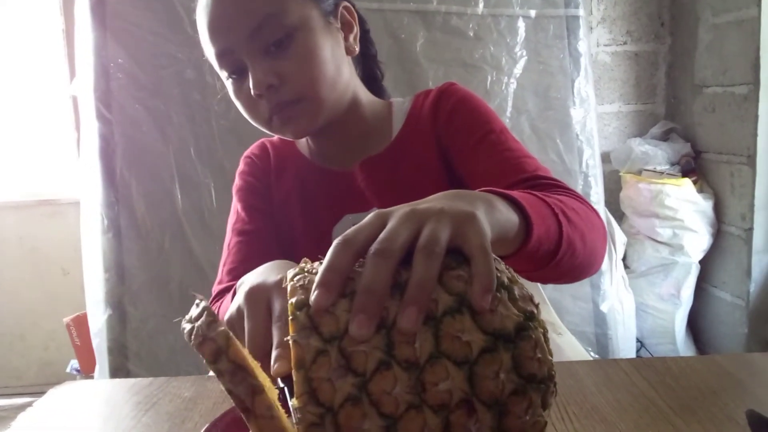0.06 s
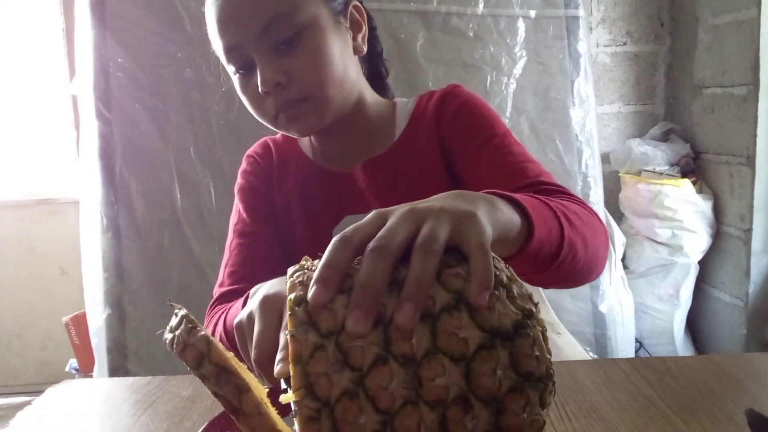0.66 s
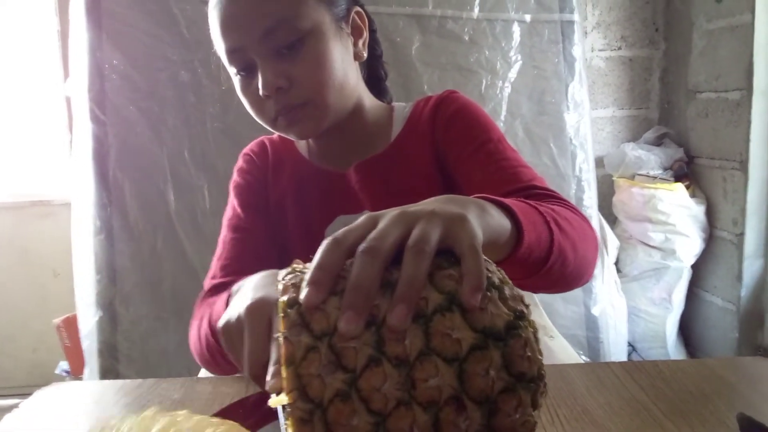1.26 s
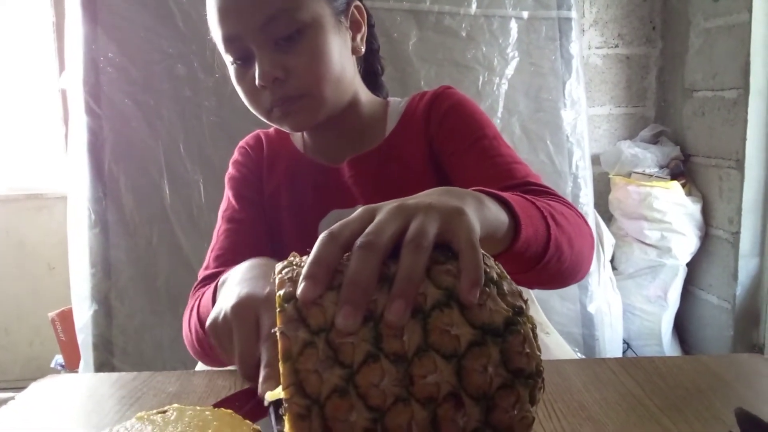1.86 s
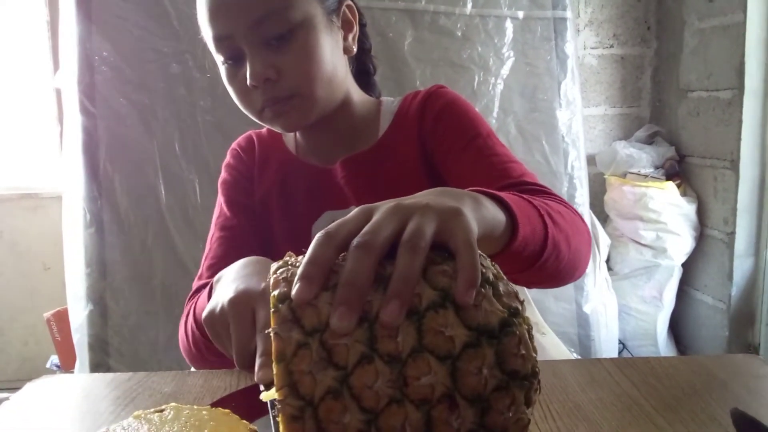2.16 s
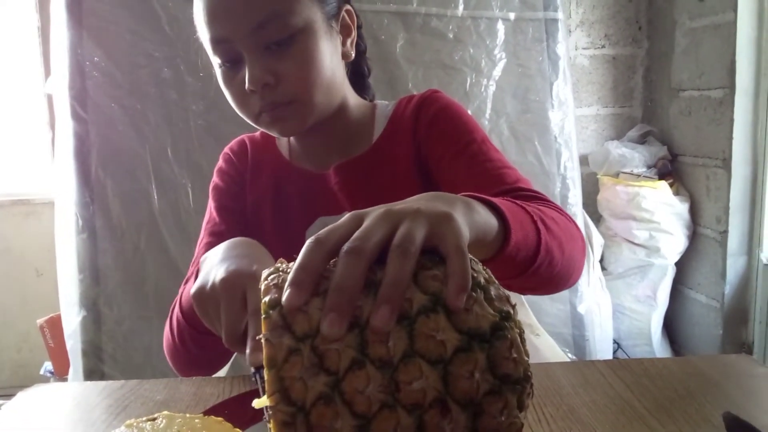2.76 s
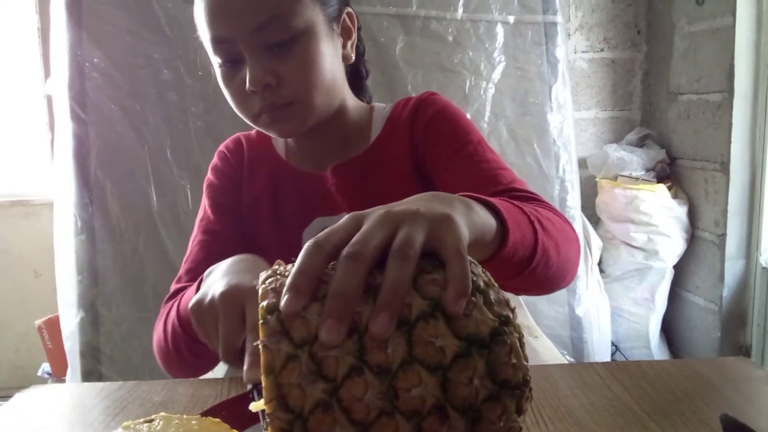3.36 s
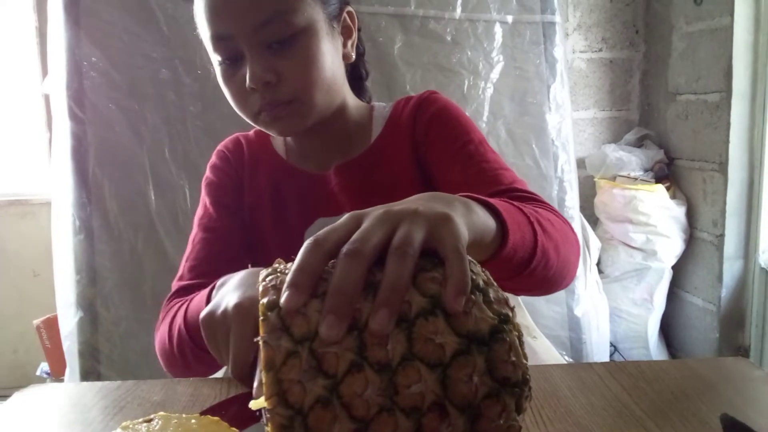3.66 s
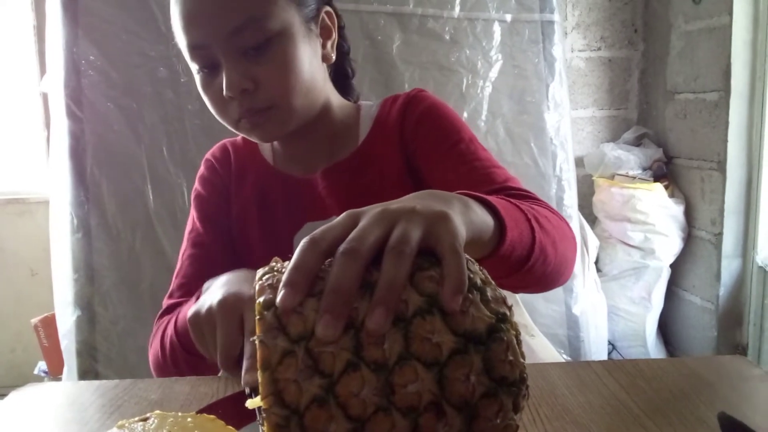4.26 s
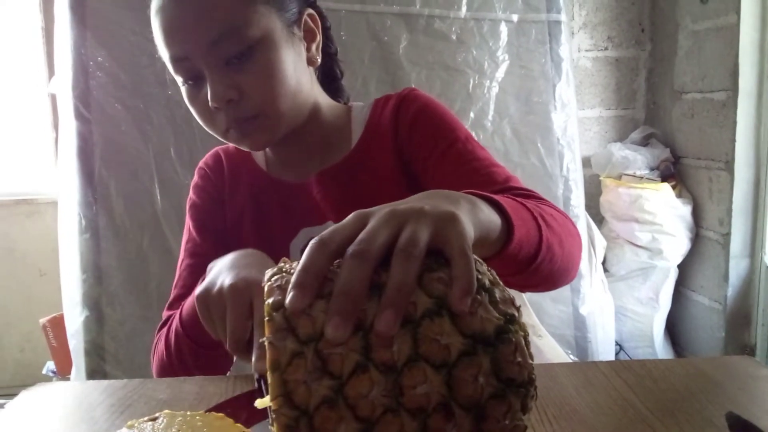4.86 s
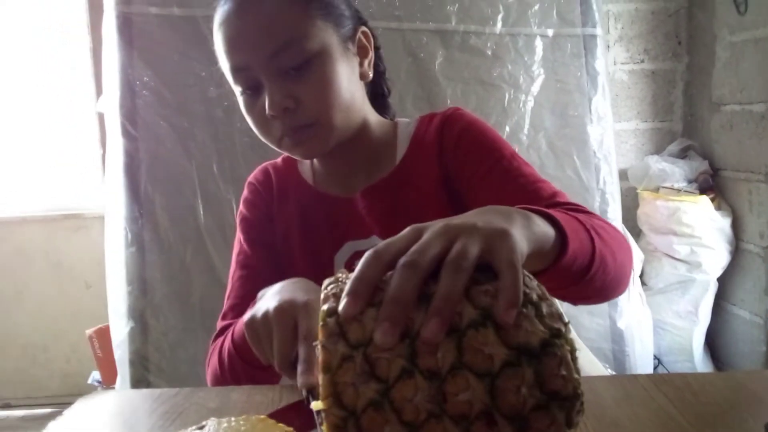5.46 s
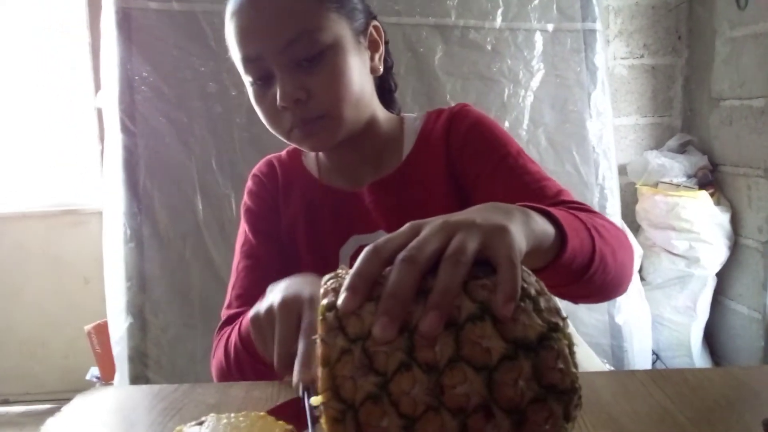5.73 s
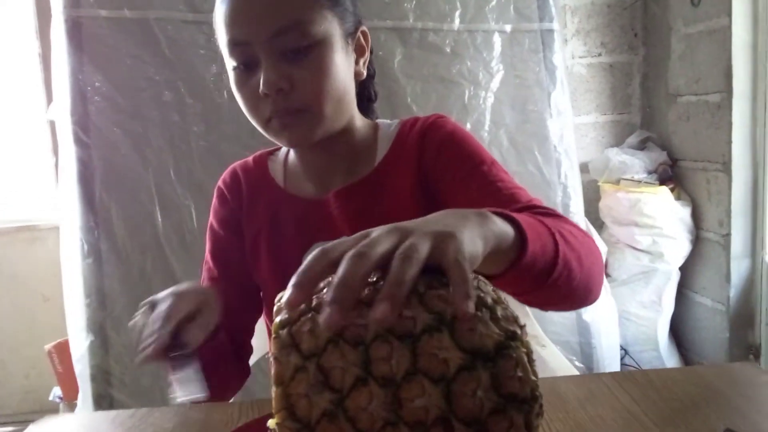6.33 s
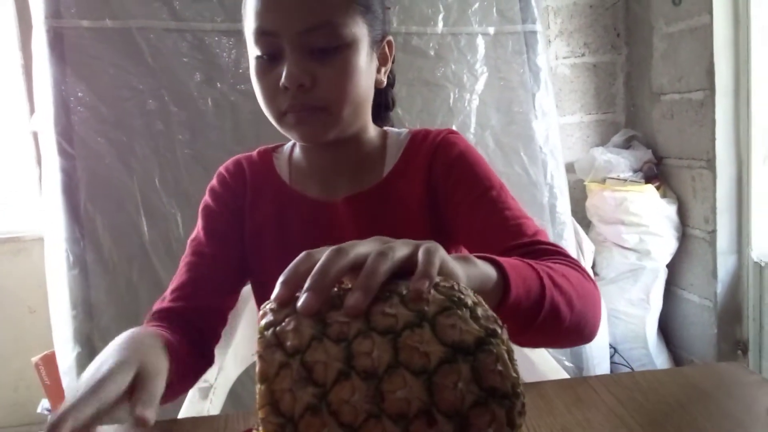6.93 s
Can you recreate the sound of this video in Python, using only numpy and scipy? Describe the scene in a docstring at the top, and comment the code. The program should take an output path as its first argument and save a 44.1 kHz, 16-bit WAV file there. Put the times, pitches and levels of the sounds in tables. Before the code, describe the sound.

Close by in a small kitchen, tough pineapple fibres crunch and snap under a serrated knife, in quiet bursts with short gaps. Dull bumps come through the wooden table as the fruit rocks. Steel hits the plate more and more often, scrapes across it once, and finally the knife lands and bounces with a bright clatter and a wooden knock. Low room tone and barely audible chirps lie underneath.

```python
"""A serrated knife saws the rind off a pineapple that stands on a plate on a wooden kitchen table.
Fibres snap and hiss under the teeth, juicy cells tick, and the slit opens with hollow pops.
The fruit rocks and thuds on the table, and the blade clinks on the plate as it cuts through.
The knife scrapes once across the plate, then is put down with a clatter. The crunch is grainy noise,
steel and wood ring in decaying modes, and behind them sit room tone and faint, blurred chirps."""
import sys
import numpy as np
from scipy import signal
from scipy.fft import rfft, irfft
from scipy.io import wavfile
from scipy.ndimage import uniform_filter1d

SR = 44100
rng = np.random.default_rng(int(sys.argv[2]) if len(sys.argv) > 2 else 0)


def wav_record(signal):
    """Record a signal, one row per channel, as 16-bit PCM in the file named by sys.argv[1]."""
    frames = np.transpose(np.atleast_2d(signal))
    bounded = np.clip(frames, -1, 1)
    # unit amplitude maps onto the largest positive 16-bit level
    quanta = np.round(bounded * 32767).astype(np.int16)
    wavfile.write(sys.argv[1], SR, quanta)


N = 312669
TIME = np.arange(N) / SR


def from_db(db):
    """Decibels to gain."""
    return 10 ** (np.asarray(db) / 20)


def rms_one(x):
    """Scale to unit rms."""
    return x / np.sqrt(np.mean(x ** 2) + 1e-20)


def levelled(x, size):
    """Ride the gain to hold unit rms over a window of `size` samples."""
    return x / np.sqrt(uniform_filter1d(x ** 2, size) + 1e-12)


def at_hz(points, hz):
    """Read a table along a log-frequency axis."""
    f, value = np.transpose(points)
    return np.interp(np.log(np.maximum(hz, 1)), np.log(f), value)


def passed(x, hz, kind):
    """Gentle Butterworth filter."""
    return signal.sosfilt(signal.butter(2, hz, kind, fs=SR, output="sos"), x)


def convolved(x, response):
    """Play x through an impulse response scaled to unit energy."""
    return signal.oaconvolve(x, response / np.linalg.norm(response))[:N]


def coloured(x, colour, size=4096):
    """Minimum-phase EQ of unit energy that follows a colour curve."""
    cepstrum = irfft(np.log(from_db(at_hz(colour, np.fft.rfftfreq(size, 1 / SR)))))
    cepstrum[1:size // 2] *= 2
    cepstrum[size // 2 + 1:] = 0
    return convolved(x, irfft(np.exp(rfft(cepstrum))))


def add(track, s, sound):
    """Mix a sound or an envelope into a track at time s."""
    part = track[round(s * SR):][:len(sound)]
    part += sound[:len(part)]


def decay(t60, size):
    """An envelope that falls 60 dB in t60 seconds."""
    return np.exp(-np.log(1000) * TIME[:size] / t60)


def ringing(modes, vary_db, size=10000):
    """One blow: decaying sines, each mode with a strength and sign of its own."""
    hz, db, t60 = np.transpose(modes)[:, :, None]
    strength = from_db(db + vary_db * rng.standard_normal(db.shape))
    sign = rng.choice([-1, 1], db.shape)
    return np.sum(strength * sign * decay(t60, size) * np.sin(2 * np.pi * hz * TIME[:size]), axis=0)


def burst(t60, size=10000):
    """A crack of noise that dies at once."""
    return rng.standard_normal(size) * decay(t60, size)


def grains(per_s, spread_db, smooth_db):
    """Random tiny fractures of uneven size over smooth friction, evened to a steady level."""
    sizes = from_db(spread_db * np.minimum(rng.exponential(1, N), 4))
    clicks = rms_one((rng.random(N) < per_s / SR) * sizes * rng.choice([-1, 1], N))
    friction = from_db(smooth_db) * rng.standard_normal(N)
    return levelled(clicks + friction, size=2400)


def strokes(rows, attack_s, build_db, release_db_per_s, size=36000):
    """Envelope of strokes (start s, length s, dB): the blade bites, bears down harder, then lets go."""
    t, out = TIME[:size], np.zeros(N)
    for s, length, db in rows:
        pressure_db = build_db * (np.minimum(t / length, 1) - .5)
        release_db = release_db_per_s * np.maximum(t - length, 0)
        add(out, s, np.minimum(t / attack_s, 1) * from_db(db + pressure_db - release_db))
    return out


# The kitchen's reverb time. Each row: frequency in Hz, t60 in seconds.
ROOM_T60 = [(60, 0.21), (300, 0.25), (1000, 0.27), (3000, 0.22), (8000, 0.22), (16000, 0.18)]

def kitchen(x, wet_db, first_echo_s, size=20000):
    """Direct sound plus a short diffuse tail that dies sooner in the treble."""
    hz, centres = np.fft.rfftfreq(size, 1 / SR), np.transpose(ROOM_T60)[0]
    white = rfft(rng.standard_normal(size))
    tail = 0
    for share, (_, t60) in zip(np.eye(len(centres)), ROOM_T60):
        band = irfft(white * at_hz(np.c_[centres, share], hz))
        tail = tail + band * decay(t60, size)
    fade_in = np.clip(TIME[:size] / first_echo_s - 1, 0, 1)
    wet = from_db(wet_db)
    return (x + wet * convolved(x, tail * fade_in)) / np.sqrt(1 + wet ** 2)


# The room tone's EQ. Each row: frequency in Hz, relative level in dB.
ROOM_TONE_COLOUR = [(15, -51), (25, -26.5), (64, 6), (108, 1.5), (190, -6.5), (503, -8), (1190, -25),
                    (1940, -22), (2220, -18.5), (2610, -18), (5430, -24.5), (8830, -35.5), (14400, -25.5),
                    (16000, -64)]

def room_tone():
    """A steady, bass-heavy bed of soft noise."""
    return from_db(-60.5) * coloured(rng.standard_normal(N), ROOM_TONE_COLOUR)


# Faint chirps. Each row: start and length in seconds, first pitch, last pitch and width in Hz,
# level in dB.
CHIRPS = [(0, .3, 3400, 2800, 1800, -62), (.2, .22, 3600, 3750, 450, -65), (.32, .28, 3900, 4100, 500, -64),
          (.4, .17, 5700, 5450, 400, -68), (.25, .7, 3000, 2850, 800, -64),
          (.52, .14, 4350, 4400, 500, -62), (.63, .1, 4350, 4350, 500, -63),
          (.7, .12, 4700, 4500, 450, -63), (.78, .24, 4850, 5200, 400, -63),
          (1.43, .13, 6200, 5000, 600, -60), (2.42, .3, 2250, 2500, 550, -65),
          (2.6, .36, 1980, 2120, 140, -64), (2.82, .28, 2200, 1850, 450, -68),
          (3.28, .36, 2250, 1800, 220, -63), (2.36, .12, 2900, 2850, 200, -67),
          (2.71, .12, 5550, 5300, 250, -70), (4.12, .38, 4600, 3600, 1000, -66),
          (4.48, .26, 5400, 4800, 900, -64), (4.9, .16, 4600, 4200, 700, -66),
          (5.68, .14, 4300, 3900, 450, -66)]

def chirps():
    """Narrow bands of noise swell, glide and fade in the background."""
    out = np.zeros(N)
    for s, length, start_hz, end_hz, width_hz, db in CHIRPS:
        count = round(length * SR)
        blur = passed(rng.standard_normal((2, SR)), width_hz / 2, "low")[:, -count:]
        phase = 2 * np.pi * np.cumsum(np.linspace(start_hz, end_hz, count)) / SR
        band = rms_one(blur[0] * np.cos(phase) + blur[1] * np.sin(phase))
        add(out, s, from_db(db) * signal.windows.hann(count) * band)
    return out


# The handle knocks and the fruit rocks down on the table. Each row: start in seconds, level in dB.
HANDLE_KNOCKS = [(6.501, -37.5), (6.535, -36.5), (6.567, -36.5), (6.707, -19.5), (6.729, -21.5),
                 (6.955, -45.5)]
FRUIT_THUDS = [(1.29, -41), (2.09, -42), (2.255, -64), (3.31, -35.5), (3.795, -40), (3.905, -32.5),
               (4.772, -39.5), (5.115, -26), (5.929, -24.5)]
# The body of a knock and of a thud. Each row: frequency in Hz, relative level in dB, t60 in seconds.
TABLE_MODES = [(150, -17, .15), (240, -15, .08), (310, -11, .05), (383, 0, .12), (435, -7, .05),
               (615, -14, .11), (985, -12, .11), (1218, -14, .1)]
FRUIT_MODES = [(78, -12, .1), (134, 0, .11), (175, -5, .07), (350, -11, .05)]

def thumps():
    """Dull blows on the wooden table, which radiates no deep bass."""
    out = np.zeros(N)
    for hits, modes in (HANDLE_KNOCKS, TABLE_MODES), (FRUIT_THUDS, FRUIT_MODES):
        for s, db in hits:
            add(out, s, from_db(db) * ringing(modes, vary_db=0.5))
    return passed(out, 110, "high")


def steel_strikes(hits, modes, colour, crack_db, crack_t60, rise_s):
    """Modes plus a contact crack; each blow has its own ring, click and treble levels."""
    out = np.zeros(N)
    for s, *levels in hits:
        tone = ringing(modes, vary_db=1.6)
        crack = from_db(crack_db) * coloured(burst(crack_t60), colour)[:len(tone)]
        attack = 1 - np.exp(-TIME[:len(tone)] / rise_s)   # bending waves take a moment to fill the blade
        blow = (tone + crack) * attack
        ring = passed(blow, 4200, "low")
        click = passed(blow, [4200, 7400], "band")
        treble = passed(blow, [9000, 15000], "band")
        for band, db in zip((ring, click, treble), levels):
            add(out, s, from_db(db) * band / np.std(band[:550]))   # level of the first 12 ms
    return out


# The knife lands and bounces. Each row: start in seconds, ring, click and treble levels in dB.
LAY_DOWN_HITS = [(6.501, -30, -29.5, -33), (6.505, -24, -37.5, -38), (6.535, -26, -29, -37),
                 (6.576, -40.5, -48, -51), (6.591, -39, -51.5, -57.5), (6.651, -46.5, -56, -58.5),
                 (6.695, -11.5, -28.5, -35), (6.707, -18.5, -20, -37), (6.712, -14.5, -27.5, -36),
                 (6.714, -18.5, -42, -33), (6.963, -54, -72, -71)]
# Its ring as it lands. Each row: frequency in Hz, relative level in dB, t60 in seconds.
LAY_DOWN_MODES = [(783, -17, .02), (1130, -15, .035), (1885, -6, .025), (2250, 2, .025), (2470, 1, .03),
                  (2870, -2, .025), (3200, -2.5, .02), (3650, -2, .025), (4700, -8, .016),
                  (5290, -4.5, .016), (5700, -7, .022), (7100, -6, .014), (10040, -17, .018),
                  (13400, -19, .018), (14650, -17, .02)]
# Contact noise EQ for clatter and grazes. Each row: frequency in Hz, relative level in dB.
CLATTER_COLOUR = [(25, -37.5), (70, -12.5), (200, -17.5), (900, -11.5), (1500, -7), (2000, 4), (2500, 3),
                  (3400, 2), (4000, -3), (5400, -1), (7300, -7), (8100, -11), (14000, -15.5),
                  (16000, -12.5)]

def clatter():
    """The knife is put down and rings at every bounce."""
    return steel_strikes(LAY_DOWN_HITS, LAY_DOWN_MODES, CLATTER_COLOUR,
                         crack_db=5, crack_t60=.014, rise_s=.0003)


# Light touches on the plate. Each row: start in seconds, length in seconds, level in dB.
GRAZES = [(1.94, 0.27, -62), (4.64, .2, -57), (4.96, 0.13, -59.5), (5.017, 0.072, -49.5),
          (5.3, 0.11, -55.5), (5.78, 0.023, -64), (6.05, 0.032, -52), (6.097, 0.011, -47)]
# The blade ringing freely. Each row: frequency in Hz, relative level in dB, t60 in seconds.
FREE_BLADE_MODES = [(2368, 2, 0.023), (2460, 1, 0.2), (3650, 1, 0.21), (3450, -7.5, 0.049),
                    (5690, -11, 0.036), (5880, -6, .04)]

def graze():
    """Teeth brushing the plate keep the blade singing softly."""
    touch = strokes(GRAZES, attack_s=.012, build_db=2.5, release_db_per_s=900)
    teeth = touch * grains(per_s=630, spread_db=6, smooth_db=-11)
    singing = convolved(teeth, ringing(FREE_BLADE_MODES, vary_db=1))
    return singing + from_db(-11) * coloured(teeth, CLATTER_COLOUR)


# Tip and edge hit the plate. Each row: start in seconds, ring, click and treble levels in dB.
TIP_HITS = [(3.913, -23.5, -29.5, -36.5), (4.7745, -19.5, -23.5, -29.5), (5.019, -47, -65, -61),
            (5.059, -39, -53, -58), (5.222, -52.5, -61, -66), (5.958, -21, -22.5, -26),
            (6.097, -42.5, -48.5, -65)]
EDGE_HITS = [(1.754, -55.5, -61.5, -70), (1.855, -31.5, -45.5, -46), (3.156, -55, -64, -72),
             (3.576, -44, -58, -57), (3.601, -32, -39, -45), (4.4875, -33, -39, -44.5),
             (4.663, -51, -65, -70), (4.726, -61, -47, -53), (5.493, -52, -50, -53),
             (5.8025, -23.5, -32, -32.5), (5.918, -26, -34, -35.5), (5.932, -26.5, -49, -36)]
# The knife's ring for each contact. Each row: frequency in Hz, relative level in dB, t60 in seconds.
TIP_MODES = [(2370, -2.5, .075), (2700, -14, .05), (3400, 1, .018), (3540, 4, .02), (3720, -8, .045),
             (4730, -8, .035), (5480, -3, .016), (5680, 0, .022), (6020, -8, .03), (7620, -6, .02),
             (8250, -6, .016), (9470, -10, .028), (11020, -8, .035), (11360, -11, .035), (13900, -9, .028),
             (14630, -4.5, .03)]
EDGE_MODES = [(1725, -13, .045), (2357, -4, .046), (2738, 0, .037), (3748, 6, .033), (3903, 9, .016),
              (4890, -9, .025), (6020, -1, .022), (7750, -5, .04), (8070, -9, .035), (9580, 2, .028),
              (11400, -3, .03), (13650, 4, .03), (14650, -6, .04)]
# The contact crack's EQ. Each row: frequency in Hz, relative level in dB.
CLINK_COLOUR = [(30, -36), (200, -0.5), (500, -1.5), (1400, -1), (2400, 3), (3600, 4.5), (6000, 5),
                (8200, -14.5), (12000, -1), (14000, -23.5), (16000, 7.5)]

def clinks():
    """The blade strikes the plate: a tight crack from the tip, a longer one from the cutting edge."""
    tip = steel_strikes(TIP_HITS, TIP_MODES, CLINK_COLOUR, crack_db=4, crack_t60=.014, rise_s=.0003)
    edge = steel_strikes(EDGE_HITS, EDGE_MODES, CLINK_COLOUR, crack_db=2.5, crack_t60=.062, rise_s=.00055)
    return tip + edge


# The scrape's EQ. Each row: frequency in Hz, relative level in dB.
SCRAPE_COLOUR = [(88, -29), (150, -10), (201, -21), (545, -8), (745, -22), (871, -8.5), (1480, -14.5),
                 (2650, -9), (3100, -17), (3700, -11), (4000, -16.5), (5570, -16.5), (8900, -31.5),
                 (13400, -24), (16000, -25)]

def scrape(start_s=5.357, length_s=0.13, db=-36.5, judder_hz=17, judder_db=3.5):
    """Serrations stick and slip unevenly as the blade is drawn once across the plate."""
    judder = from_db(judder_db * rms_one(passed(rng.standard_normal(N), judder_hz, "low")))
    pull = strokes([(start_s, length_s, db)], attack_s=0.009, build_db=2.1, release_db_per_s=760)
    return coloured(judder * pull * grains(per_s=500, spread_db=2.5, smooth_db=0), SCRAPE_COLOUR)


# Pops from the cut. Each row: start in seconds, pitch in Hz, level in dB.
HOLLOW_POPS = [(.9, 770, -35), (1.06, 610, -62), (1.283, 518, -34.5), (3.285, 500, -32.5),
               (3.57, 557, -37.5), (4.649, 890, -42)]

def hollow_pops(t60=0.035):
    """The slit in the fruit gives a short hollow note as it opens."""
    out = np.zeros(N)
    for s, hz, db in HOLLOW_POPS:
        add(out, s, ringing([(hz, db, t60)], vary_db=1))
    return out


# Tough bits of rind give way. Each row: start in seconds, dry click and wet tick levels in dB.
SNAPS = [(0.123, -56, -27), (0.132, -29, -42), (0.25, -37.5, -48), (0.876, -37, -26), (0.901, -31, -38),
         (1.032, -50, -33), (1.061, -28.5, -26), (1.073, -27, -44), (1.171, -28, -50), (1.258, -28, -58),
         (1.279, -22, -52), (1.295, -29, -29), (1.319, -34, -31), (1.365, -39, -45), (1.583, -35, -56),
         (1.622, -30, -49), (1.652, -37, -40), (1.834, -28, -54), (2.089, -25.5, -50), (3.076, -35, -59),
         (3.095, -33.5, -55), (3.262, -28, -30.5), (3.274, -27.5, -38), (3.288, -23, -48),
         (3.728, -47, -40), (3.797, -31, -47), (3.894, -35, -28), (6.122, -41, -33), (6.348, -60.5, -38)]
# EQs for snaps and sawing: crisp fibres, bright juice, dull flesh.
# Each row: frequency in Hz, relative level in dB.
FIBRE_COLOUR = [(500, -11.5), (1200, 2), (2500, 7), (3700, 5.5), (6000, 2.5), (8500, -9.5), (11500, -9),
                (14000, -17), (15200, -2), (17000, -19.5)]
JUICE_COLOUR = [(1500, -18), (3200, -8), (6000, -10), (8500, -18), (10200, -6), (12000, -10), (13700, 4),
                (15000, -1), (16000, -12)]
FLESH_COLOUR = [(30, -28), (150, 0), (300, 6.5), (520, 6), (750, -3), (1100, -4), (1600, -11.5), (2600, -6),
                (5000, -25.5)]

def snaps():
    """A tough fibre breaks with a dry click, a wet tick and a brief splintering."""
    clicks, ticks = np.zeros((2, N))
    for s, click_db, tick_db in SNAPS:
        crack = 0.21 * burst(t60=0.019)
        crack[0] += .4   # the break itself, ahead of the splinters
        add(clicks, s, from_db(click_db) * crack)
        add(ticks, s, from_db(tick_db) * crack)
    body = from_db(-6) * coloured(clicks, FLESH_COLOUR)
    return coloured(clicks, FIBRE_COLOUR) + body + coloured(ticks, JUICE_COLOUR)


# The table rumble's EQ. Each row: frequency in Hz, relative level in dB.
RUMBLE_COLOUR = [(25, -38), (50, -2), (75, 2.5), (100, -7), (135, 15), (175, -4.5), (250, -6), (450, -40.5)]
# Pushes and pulls of the knife. Each row: start and length in seconds, then the levels of
# tearing fibres, rasping flesh and table rumble in dB.
SAW_STROKES = [(0.0, 0.045, -62, -65, -67), (0.102, .05, -57, -52, -53), (0.517, 0.18, -84, -72, -80),
               (0.862, 0.042, -50, -57.5, -59), (0.987, 0.084, -55, -50.5, -48.5),
               (1.11, 0.023, -74, -65, -51), (1.163, 0.029, -59, -56.5, -50.5),
               (1.264, 0.074, -56.5, -50.5, -48.5), (1.35, 0.028, -56.5, -69, -50),
               (1.478, 0.15, -57, -56.5, -53), (1.828, 0.067, -60, -47, -45.5),
               (1.962, 0.082, -61.5, -52.5, -53.5), (2.048, 0.071, -52, -52, -44.5),
               (2.224, 0.067, -58, -57, -49), (2.438, 0.032, -67.5, -63, -55.5),
               (2.547, 0.061, -65, -68, -55.5), (2.669, 0.034, -63, -64, -54), (2.847, .1, -66, -66, -54),
               (3.041, 0.056, -60.5, -60, -57), (3.137, 0.025, -72, -71, -53.5),
               (3.254, 0.065, -51, -54.5, -52.5), (3.492, 0.036, -60, -66, -51.5),
               (3.549, 0.069, -51.5, -46, -47.5), (3.682, 0.14, -51, -49.5, -42),
               (3.879, 0.025, -42, -47, -37), (4.254, 0.043, -57, -63, -50), (4.394, 0.1, -65.5, -65, -59),
               (4.481, 0.074, -72, -49.5, -52.5), (4.632, 0.12, -55, -48, -43),
               (4.761, 0.03, -36.5, -41, -46), (5.031, 0.092, -55, -49.5, -50.5),
               (5.718, 0.11, -90, -73, -46.5), (5.895, 0.062, -58, -38, -40),
               (6.059, 0.12, -62, -90, -64.5)]

def sawing(juice_db=-8):
    """Teeth tear the fibres, burst juicy cells, rasp through the flesh and shake the table."""
    s, length, fibre_db, flesh_db, rumble_db = np.transpose(SAW_STROKES)
    bite = strokes(zip(s, length, fibre_db), attack_s=0.028, build_db=1.6, release_db_per_s=300)
    rasp = strokes(zip(s, length, flesh_db), attack_s=0.03, build_db=1, release_db_per_s=234)
    push = strokes(zip(s, length, rumble_db), attack_s=0.029, build_db=2.9, release_db_per_s=267)
    fibres = coloured(bite * grains(per_s=320, spread_db=3.2, smooth_db=-5), FIBRE_COLOUR)
    cells = from_db(juice_db) * bite * grains(per_s=70, spread_db=5.5, smooth_db=-14)
    juice = coloured(convolved(cells, burst(t60=0.0033)), JUICE_COLOUR)
    flesh = coloured(rasp * grains(per_s=500, spread_db=2, smooth_db=-7.5), FLESH_COLOUR)
    shake = coloured(grains(per_s=140, spread_db=7.5, smooth_db=-2.5), RUMBLE_COLOUR)
    return fibres + juice + flesh, push * levelled(shake, size=2600)


def scene():
    """Crunch, steel and table sound in the small room; the rumble comes straight through the table."""
    crunch, rumble = sawing()
    blade, landing, wood = clinks(), clatter(), thumps()
    cutting = kitchen(crunch + snaps() + hollow_pops() + scrape(), wet_db=-7, first_echo_s=0.0054)
    steel = kitchen(blade + graze(), wet_db=-4, first_echo_s=0.0074)
    steel += kitchen(landing, wet_db=-5, first_echo_s=0.0045)
    table = kitchen(wood, wet_db=-7.5, first_echo_s=0.011) + rumble
    return (cutting + steel + table + room_tone() + chirps())[None]


def record(dry):
    """Soft-clip the loudest peaks and cut the top steeply."""
    ceiling, cutoff_hz = 0.83, 15700
    rounded = ceiling * np.tanh(dry / ceiling)
    return signal.sosfilt(signal.ellip(10, .1, 80, cutoff_hz, fs=SR, output="sos"), rounded)


dry = scene()
out = record(dry)
wav_record(out)
```